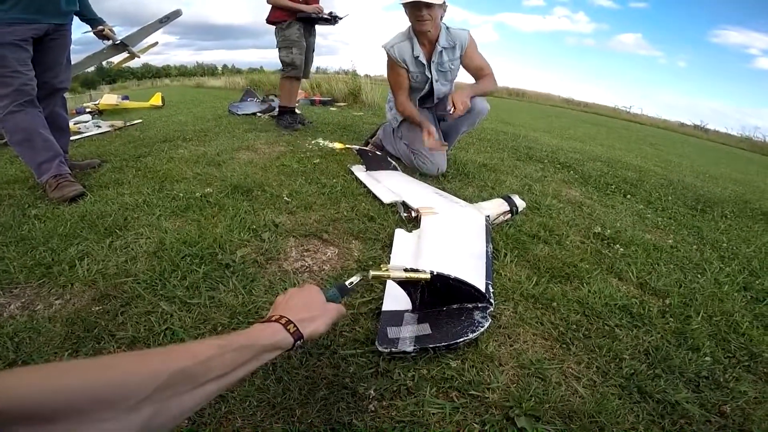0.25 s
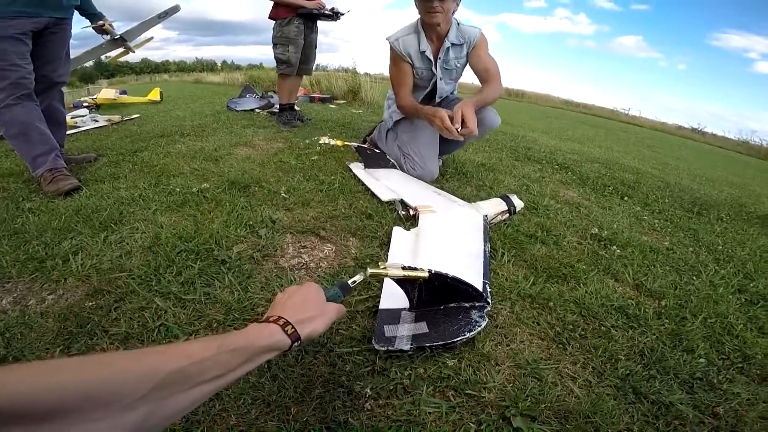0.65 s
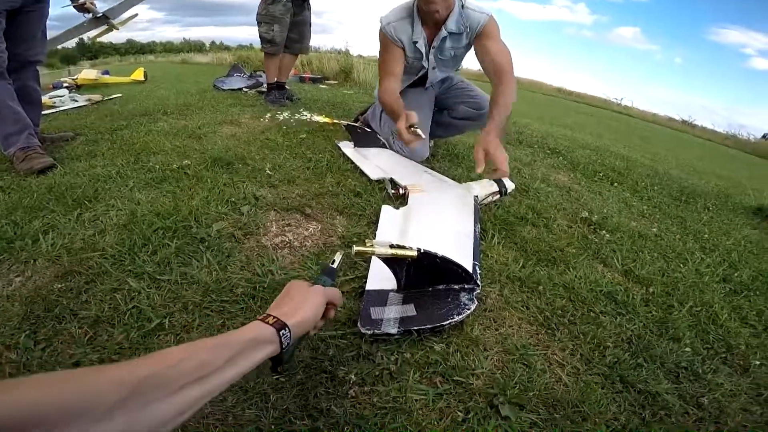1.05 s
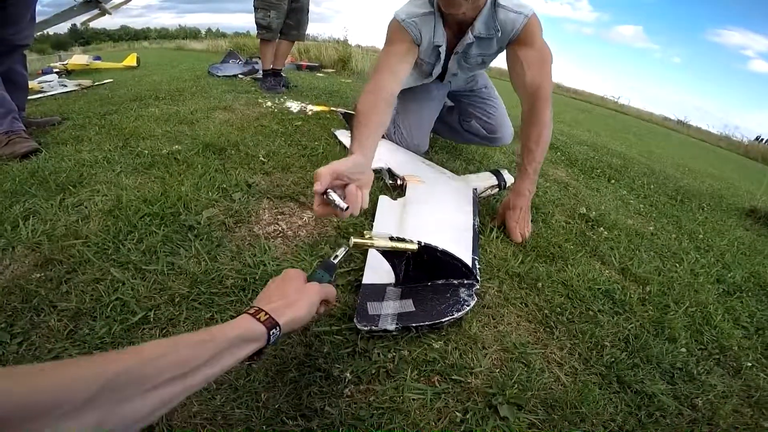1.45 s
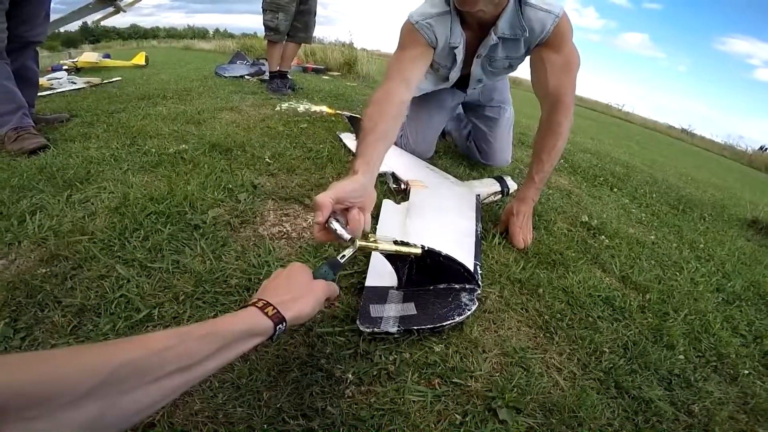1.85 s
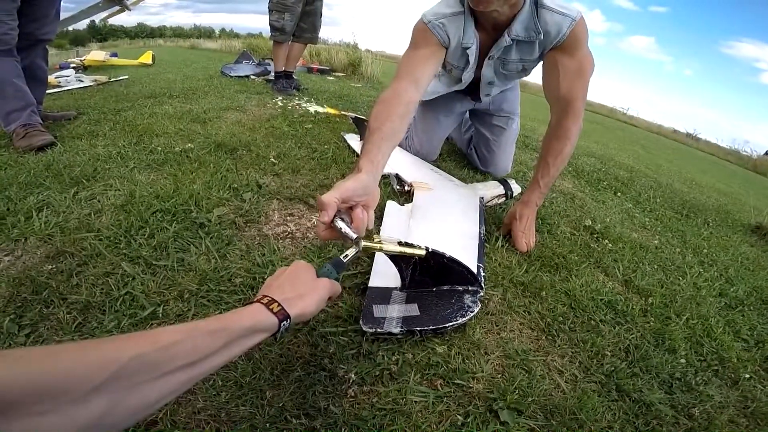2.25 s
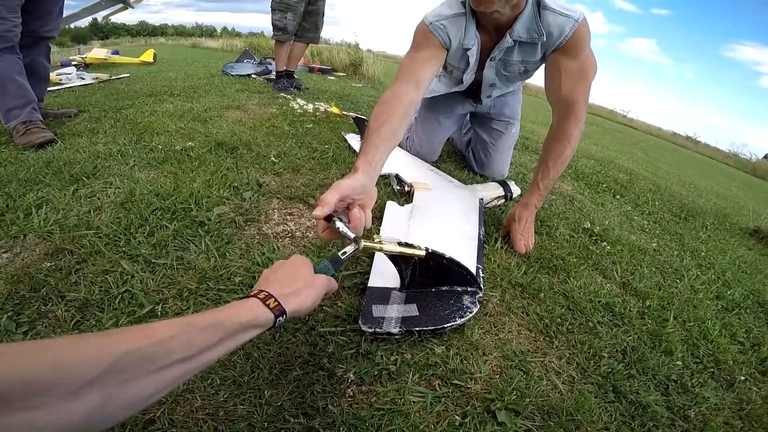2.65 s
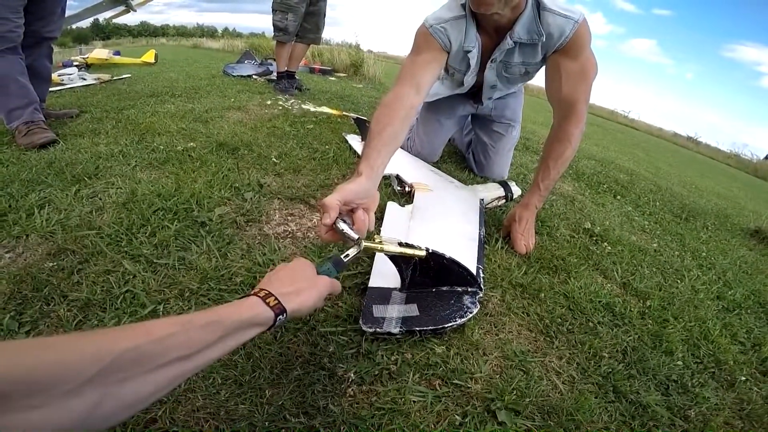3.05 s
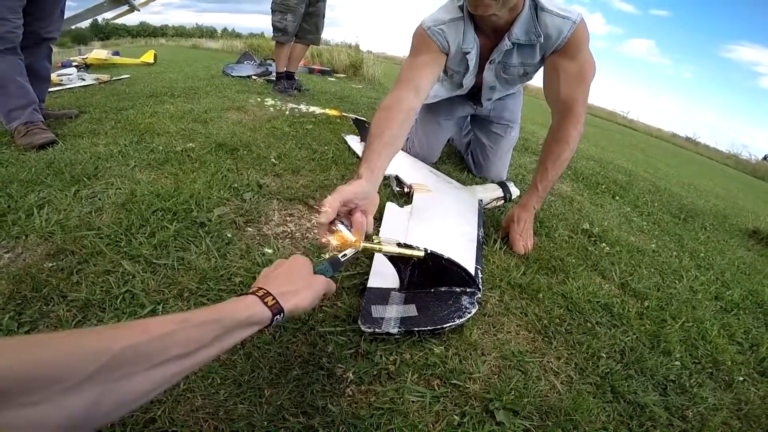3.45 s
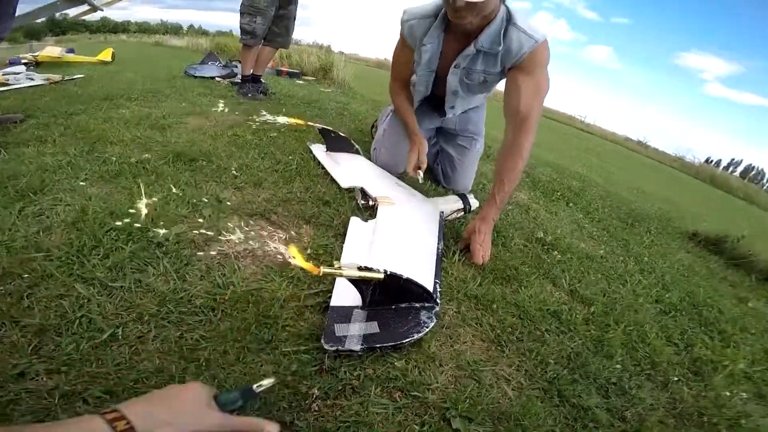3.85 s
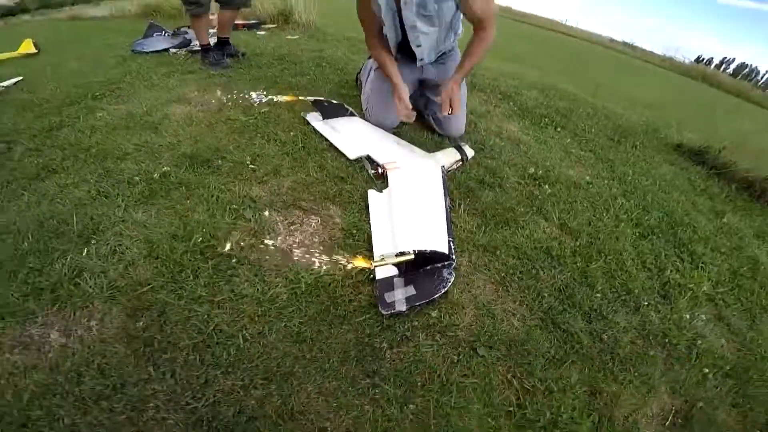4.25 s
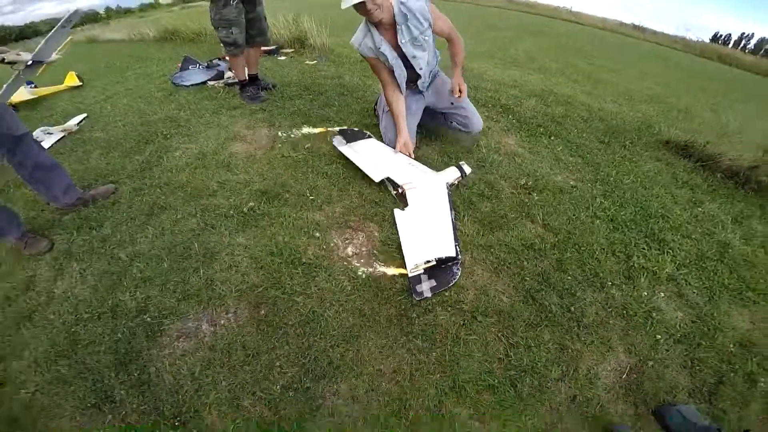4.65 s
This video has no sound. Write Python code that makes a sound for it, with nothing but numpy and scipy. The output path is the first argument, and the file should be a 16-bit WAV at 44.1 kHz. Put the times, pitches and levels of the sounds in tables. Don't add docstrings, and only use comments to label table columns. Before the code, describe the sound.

Outdoors on a grassy field, a small camera in a plastic housing hears a sparkler about a metre away: steady thin hiss, tiny crackles and isolated sharp pops, over faint low wind buffeting. Around 3.5 seconds a nearer sparkler catches and the fizz brightens. The camera then swings back, with deep air heaves, hard plastic knocks and close cracks near 4 seconds, stronger wind and grass swish while the near fizz fades.

```python
import sys
import numpy as np
from scipy import signal
from scipy.fft import rfft, irfft
from scipy.io import wavfile
from scipy.ndimage import uniform_filter1d

SR = 44100
rng = np.random.default_rng(int(sys.argv[2]) if len(sys.argv) > 2 else 0)


def output_pcm(signal):
    pcm = np.clip(np.atleast_2d(signal).T, -1, 1) * 32767
    wavfile.write(sys.argv[1], SR, np.round(pcm).astype(np.int16))


def elevation(decibels):
    levels = np.asarray(decibels, float)
    return 10 ** (levels / 20)


N = 211274


def set_rms(x, db):
    return x * elevation(db) / np.sqrt(np.mean(x ** 2))


def noise():
    return rng.standard_normal(N)


def band(x, lo_hz, hi_hz, order=2):
    sos = signal.butter(order, [lo_hz, hi_hz], "bandpass", fs=SR, output="sos")
    return signal.sosfilt(sos, x)


def slope_db(points, hz):
    point_hz, point_db = np.transpose(points)
    return np.interp(np.log(hz), np.log(point_hz), point_db)


def wander(rate_hz):
    hold = int(SR / rate_hz)
    steps = np.repeat(rng.standard_normal(N // hold + 1), hold)
    smooth = uniform_filter1d(uniform_filter1d(steps, hold), hold)
    return 1.23 * smooth[:N]


def follow(control, rest_db, layers):
    times, control_db = np.transpose(control)
    swing_db = np.interp(np.arange(N) / SR, times, control_db) - rest_db
    return [layer_db + share * swing_db for layer_db, share in layers]


def add(out, s, x):
    start = max(int(s * SR), 0)
    out[start:start + len(x)] += x[:N - start]


def rings(table, rise_s):
    out = np.zeros(N)
    t = np.arange(SR // 2) / SR
    for s, peak_db, hz, t60 in table:
        decay = np.exp(-np.log(1000) * t / t60)
        swing = np.sin(2 * np.pi * hz * t) * decay * (1 - np.exp(-t / rise_s))
        add(out, s, swing * elevation(peak_db) / np.abs(swing).max())
    return out


def microphone():
    return set_rms(band(noise(), 12500, 16000, order=3), -77.5)


# (frequency [Hz], level [dB])
HUSH_TONE = [(88, -36), (150, -2), (493, -8.5), (701, -10), (1400, -14), (2190, -21), (2450, -10),
             (3000, -4), (3900, -16), (6600, -120)]


def field():
    hz = np.maximum(np.fft.rfftfreq(N, 1 / SR), 1)
    hush = irfft(rfft(noise()) * elevation(slope_db(HUSH_TONE, hz)), N)
    return set_rms(hush, -66) * elevation(0.48 * wander(2.72))


def rustle():
    t = np.arange(N) / SR
    turn_s, step_back_s, step_rise_s = 3.65, 3.9, 0.92
    tone_db, swish_db = follow(BURN, CALM_BURN_DB, [(-84, 1.9), (-78, 0.93)])
    tone_db = tone_db - 7 * np.clip((t - turn_s) / 0.3, 0, 1)
    swish_db = swish_db + 10 * np.clip((t - step_back_s) / step_rise_s, 0, 1)
    tone = set_rms(band(noise(), 1623, 1698), 0) * elevation(tone_db)
    swish = set_rms(band(noise(), 770, 2400), 0) * elevation(swish_db + wander(13))
    return tone + swish


# (time [s], level [dB])
WIND_STRENGTH = [(0.0, -45), (.16, -51.5), (.27, -45), (.58, -51.5), (.76, -43), (.93, -49), (1.05, -45.5),
                 (1.32, -51), (1.69, -45), (2.1, -45.5), (2.28, -53), (2.67, -47), (2.92, -52.5),
                 (3.25, -46.5), (3.59, -51.5), (3.8, -34), (4.0, -33), (4.79, -41)]
# (level in a breeze [dB], share of swings [ratio])
EDDY_LAYERS = [(-46, 0.93), (-54.5, .6), (-72.5, 0.12)]
# (time [s], peak [dB], frequency [Hz], time to fall 60 dB [s])
AIR_SLAPS = [(.09, -33, 98, 0.036), (.2, -45, 86.4, 0.093), (.675, -46.5, 126, 0.029), (.74, -41, 69, 0.1),
             (1.935, -40.5, 72, 0.15), (3.082, -33.5, 96, 0.063), (3.593, -38, 104.6, 0.043),
             (3.797, -34.5, 108, 0.063), (4.06, -40, 128, 0.068), (.92, -49, 99, 0.065),
             (1.42, -49.5, 119, .05), (1.68, -45, 90, .06), (2.19, -50, 100, .09), (2.27, -49, 105, .09),
             (3.97, -41, 94.5, 0.068), (4.085, -36, 85, 0.086)]
# (time [s], peak [dB], frequency [Hz], time to fall 60 dB [s])
AIR_HEAVES = [
    (3.767, -26.5, 26, 0.146),
    (4.008, -26, 21, 0.35),
    (4.69, -32, 26.3, 0.18),
]


def wind():
    breeze_db = -47
    rumble_db, buffet_db, flutter_db = follow(WIND_STRENGTH, breeze_db, EDDY_LAYERS)
    gusts = elevation(2.2 * uniform_filter1d(wander(16), size=800))
    rumble = set_rms(band(noise(), 14.1, 29.8), 0) * elevation(rumble_db)
    buffet = set_rms(band(noise(), 44, 74.5) * gusts, 0) * elevation(buffet_db)
    flutter = set_rms(band(noise(), 73, 169) * gusts, 0) * elevation(flutter_db)
    slaps = rings(AIR_SLAPS, rise_s=0.0035)
    heaves = rings(AIR_HEAVES, rise_s=0.027)
    return rumble + buffet + flutter + slaps - heaves


# (time [s], peak [dB], frequency [Hz], time to fall 60 dB [s])
HOUSING_KNOCKS = [(4.063, -39.5, 410, 0.015), (4.0636, -28.5, 1330, 0.0091), (4.0642, -24.5, 1684, 0.011),
                  (.09, -54.5, 365, 0.025), (3.8, -56, 560, 0.024), (4.0836, -29.5, 615, 0.011),
                  (4.0836, -28.5, 1197, 0.011), (4.0836, -18, 2460, 0.0098), (3.589, -47, 286, 0.05),
                  (3.799, -49.5, 270, 0.01), (4.0638, -27, 4050, .008), (.3072, -32, 4800, .008),
                  (.8912, -36, 11500, .007), (3.0758, -29, 5100, .009), (3.0758, -36, 11300, .008),
                  (.6645, -48, 1900, .02)]


def knocks():
    return rings(HOUSING_KNOCKS, rise_s=0.00067)


def causal(gain):
    cepstrum = irfft(np.log(gain))
    half = len(cepstrum) // 2
    cepstrum[1:half] *= 2
    cepstrum[half + 1:] = 0
    return irfft(np.exp(rfft(cepstrum)))[:half]


# (frequency [Hz], width [Hz], level [dB])
HOUSING_MODES = [(1694, 130, -12), (2527, 190, -8.5), (2798, 250, -3), (3180, 340, -14), (3660, 520, -3),
                 (3910, 150, -9.5), (5370, 760, -4.5), (6060, 320, -6), (6485, 290, -4.5),
                 (7590, 930, -10.5), (8530, 340, -11), (9480, 1530, -9), (11800, 1200, -17),
                 (14100, 2700, -17.5)]
# (frequency [Hz], level [dB])
HOUSING_VALLEYS = [(600, -18.5), (1400, -22), (2200, -6.5), (4400, -8), (6900, -11), (9000, -18.5),
                   (10800, -12.5), (15300, -12.5)]


def housing():
    hz = np.maximum(np.fft.rfftfreq(4096, 1 / SR), 1)
    power = elevation(2 * slope_db(HOUSING_VALLEYS, hz))
    for mode_hz, width_hz, db in HOUSING_MODES:
        distance = 2 * (hz - mode_hz) / width_hz
        power = power + elevation(2 * db) / (1 + distance ** 2) ** 2
    return causal(np.sqrt(power))


# (offset [dB], share of brightness [ratio])
BRIGHTNESS = [(-3, .85), (0.4, 0.93)]


def colour(peak_db, weight_db, bright_db, edge_db):
    upper_db, snap_db = [peak_db + offset + share * bright_db for offset, share in BRIGHTNESS]
    return peak_db, peak_db + weight_db, upper_db, snap_db, peak_db + edge_db


def burst(shell, peaks_db, length_ms, bands_hz):
    t = np.arange(2600) / SR
    # (rise share, length share, tail time to fall 60 dB [s], filter order)
    shapes = [(0.87, 0.75, 0.027, 3), (0.17, 1.0, 0.043, 2), (1.0, 0.81, 0.021, 3),
              (0.2, 0.82, 0.035, 2), (0.24, 0.7, 0.033, 3)]
    out = np.zeros(len(t))
    for peak_db, (rise, share, t60, order), (lo_hz, hi_hz) in zip(peaks_db, shapes, bands_hz):
        end_s = share * length_ms / 1000
        blast = np.clip(t / (rise * end_s), 0.15, 1) * np.exp(-np.maximum(t - end_s, 0) / 0.00027)
        tail = elevation(-10) * np.exp(-np.log(1000) * t / t60)
        raw = rng.standard_normal(len(t)) * (blast + tail)
        rung = band(np.convolve(raw, shell)[:len(t)], lo_hz, hi_hz, order)
        out += rung * elevation(peak_db) / np.abs(signal.hilbert(rung)).max()
    return out


# (time [s], peak [dB], weight [dB], brightness [dB], edge [dB])
LOUD_POPS = [
    (0.0094, -46, -2, 0.5, -0.5),
    (0.307, -21.5, -1, -4.5, -10.5),
    (0.6641, -48.5, 5.5, 9, 6),
    (0.8908, -23.5, 1.2, -7, -4.5),
    (1.5, -22.5, -37, 3.5, -2),
    (2.7311, -21, -44, 0, -1.5),
    (2.804, -39, -5, 2, 1),
    (3.0754, -19, -6.5, -10, -12),
]
# (time [s], peak [dB], weight [dB], brightness [dB], edge [dB])
CLOSE_CRACKS = [
    (4.0605, -38, 8, 1, 1),
    (4.0628, -26.5, 8.5, 4, 3.5),
    (4.0836, -46, 23.5, -2, -8),
]
# (time [s], peak [dB], brightness [dB])
SMALL_SPARKS = [(0.408, -45, -20), (0.5631, -49, 1.5), (1.073, -49.5, -9), (1.2281, -43, -7),
                (1.5986, -44, -1), (1.9045, -45.5, -7), (2.0263, -63, -2), (2.397, -47, -13),
                (2.5406, -45.5, -0.5), (3.0165, -47, -4), (3.2071, -43, -11), (3.343, -41.5, -11),
                (3.4709, -40.5, -10), (3.6402, -38, -3.5), (3.675, -45, -28), (3.816, -34, -9),
                (3.844, -40.5, -9), (4.1587, -39.5, -15), (4.1997, -36, -6), (4.6134, -46, -0.5)]
# (low edge [Hz], high edge [Hz])
HEAVY_BANDS = ((2400, 3000), (1300, 2300), (3300, 3800), (4400, 5600), (7600, 12500))
# (low edge [Hz], high edge [Hz])
LIGHT_BANDS = ((2450, 3000), (1150, 2350), (3350, 3950), (4900, 6800), (7100, 11800))
# (low edge [Hz], high edge [Hz])
CRACK_BANDS = ((2350, 3150), (1150, 2350), (3300, 4700), (4900, 6900), (8800, 12300))
# (low edge [Hz], high edge [Hz])
SPARK_BANDS = ((2350, 3150), (1150, 2350), (3200, 4100), (4200, 6900), (7200, 13000))


def pops(shell):
    out = np.zeros(N)
    for s, peak_db, weight_db, bright_db, edge_db in LOUD_POPS:
        bands_hz = LIGHT_BANDS if weight_db < -20 else HEAVY_BANDS
        add(out, s, burst(shell, colour(peak_db, weight_db, bright_db, edge_db), 3.2, bands_hz))
    for s, *row_db in CLOSE_CRACKS:
        add(out, s, burst(shell, colour(*row_db), 1.52, CRACK_BANDS))
    for s, db, bright_db in SMALL_SPARKS:
        peaks_db = (db - 5, db - 9, db - 9, db + bright_db, db - 5 + 0.71 * bright_db)
        add(out, s, burst(shell, peaks_db, 2.47, SPARK_BANDS))
    return signal.sosfilt(signal.butter(4, 15200, fs=SR, output="sos"), out)


def burning_powder():
    sparks_per_s, spark_fade_s = 250, 0.0012
    lit = rng.random(N) < sparks_per_s / SR
    sparks = lit * elevation(4.1 * np.minimum(rng.exponential(size=N), 3.2))
    glow = np.convolve(sparks, np.exp(-np.arange(600) / SR / spark_fade_s))[:N]
    flicker_db = 0.7 * wander(20)
    return noise() * (1 + 0.31 * glow) * elevation(flicker_db)


# (time [s], level [dB])
BURN = [(0.0, -66.5), (0.73, -65), (1.03, -63), (1.6, -61), (2.07, -60.5), (2.47, -64), (3.01, -63.5),
        (3.27, -60), (3.65, -58), (4.04, -57.5), (4.19, -59), (4.43, -63.5), (4.79, -64)]
CALM_BURN_DB = -62
# (level at a calm burn [dB], share of swings [ratio])
FIZZ_LAYERS = [(-62, 0.98), (-61, 0.67), (-70, 0.29)]
# (frequency [Hz], width [Hz], level [dB])
FAR_SHADOWS = [(4320, 470, -7.5), (6900, 130, 0), (9300, 150, -1.5), (2170, 290, -5.5), (3340, 130, -3.5),
               (11000, 1400, -0.5)]
# (frequency [Hz], width [Hz], level [dB])
NEAR_RINGS = [(6700, 500, -5), (7440, 170, -4), (12160, 900, -2.5)]


def fizz(shell):
    raw = burning_powder()
    rung = signal.fftconvolve(raw, shell)[:N]
    hz = np.fft.rfftfreq(N, 1 / SR)
    shadow_db = sum(db / (1 + (2 * (hz - f) / width) ** 4) for f, width, db in FAR_SHADOWS)
    rung = irfft(rfft(rung) * elevation(shadow_db), N)

    far = np.zeros(N)
    edges_hz = [(1200, 4350), (4350, 8900), (8900, 17000)]
    for (lo_hz, hi_hz), layer_db in zip(edges_hz, follow(BURN, CALM_BURN_DB, FIZZ_LAYERS)):
        far += set_rms(band(rung, lo_hz, hi_hz, order=3), 0) * elevation(layer_db)

    near = np.zeros(N)
    for f, width, db in NEAR_RINGS:
        near += set_rms(band(raw, f - width / 2, f + width / 2, order=1), db)
    t = np.arange(N) / SR
    catch_s, catch_db_per_s = 3.52, 110
    leave_s, leave_db_per_s = 4.18, 38
    near_db = -69 - catch_db_per_s * np.maximum(catch_s - t, 0)
    near_db = near_db - leave_db_per_s * np.maximum(t - leave_s, 0)
    return far + near * elevation(near_db)


def scene():
    shell = housing()
    steady = microphone() + field() + rustle() + fizz(shell)
    top_edge = signal.ellip(7, 0.3, 40, 15200, fs=SR, output="sos")
    steady = signal.sosfilt(top_edge, steady)
    mix = steady + wind() + knocks() + pops(shell)
    return mix[None]


def band_limit(x):
    return signal.sosfilt(signal.butter(12, 16500, fs=SR, output="sos"), x)


def record(dry):
    return band_limit(dry)


dry = scene()
out = record(dry)
output_pcm(out)
```